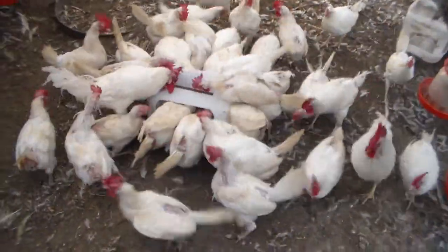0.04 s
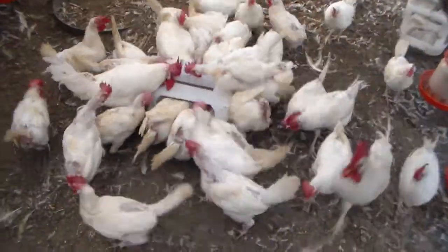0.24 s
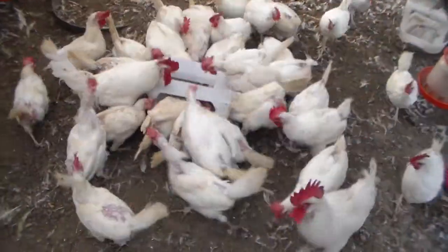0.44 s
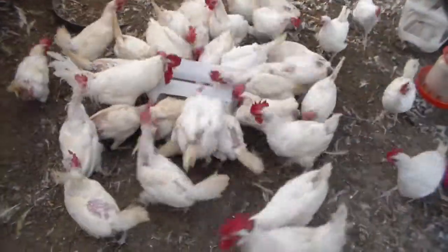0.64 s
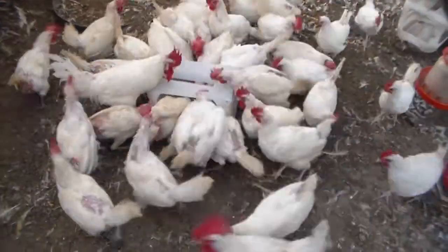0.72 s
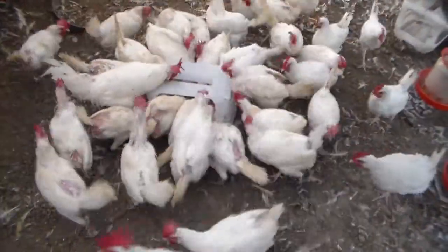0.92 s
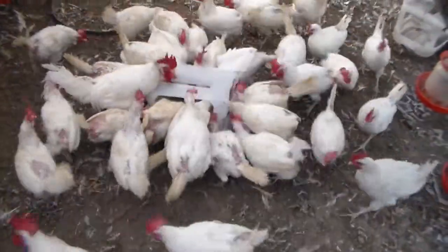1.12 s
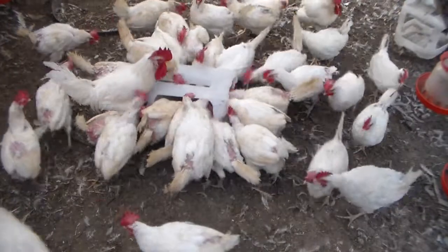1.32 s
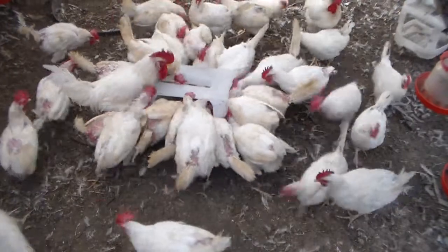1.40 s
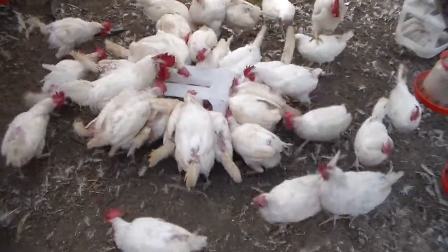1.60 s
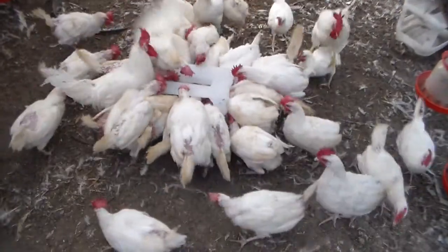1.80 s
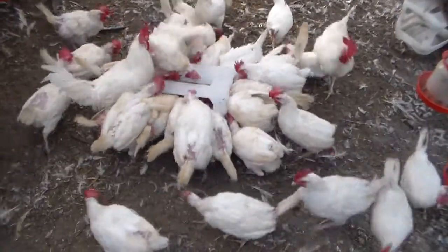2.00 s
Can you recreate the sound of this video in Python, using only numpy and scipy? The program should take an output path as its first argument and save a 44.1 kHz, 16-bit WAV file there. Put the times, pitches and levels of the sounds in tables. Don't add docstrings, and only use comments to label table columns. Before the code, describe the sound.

Close stereo pickup of a flock feeding: hard beak taps ring and rattle a plastic feeder, grit sprays wide, bodies thump softly, litter rustles faintly, and hens moan, cluck and finally whistle over the late pecks.

```python
import sys
import numpy as np
from scipy import signal
from scipy.io import wavfile

SR = 44100
rng = np.random.default_rng(int(sys.argv[2]) if len(sys.argv) > 2 else 0)


def makeup_ratio(level_db):
    decades = np.asarray(level_db, float) / 20
    return 10 ** decades


def output_pcm(signal):
    pcm = np.clip(np.atleast_2d(signal).T, -1, 1) * 32767
    wavfile.write(sys.argv[1], SR, np.round(pcm).astype(np.int16))


N = 90493

# start_s, grit_peak_db, trough_wall_db, length_s
PECKS = [(0.093, -49, -22, 0.011), (0.148, -21, -27.5, 0.031), (0.2116, -15, -21, 0.012),
         (0.218, -15, -15, 0.016), (0.242, -45, -24.5, 0.018), (0.299, -27.5, -24, 0.018),
         (0.329, -20.5, -40, 0.016), (0.385, -24, -44, 0.008), (0.419, -24.5, -43, 0.0093),
         (0.13, -26, -51, 0.014), (0.2652, -13.5, -21, 0.02), (0.4555, -12, -24.5, 0.02),
         (0.505, -24, -18, 0.057), (0.602, -23, -17, 0.044), (0.061, -22, -32, 0.006),
         (0.681, -18.5, -48, 0.019), (0.7144, -18, -16, 0.014), (0.7728, -24, -12.5, 0.02),
         (0.842, -17.5, -10.5, 0.021), (0.865, -21.5, -17, 0.029), (0.9135, -20, -20, 0.017),
         (1.01, -22.5, -40, 0.027), (1.131, -22.5, -36, 0.036), (1.192, -22, -23.5, 0.018),
         (1.2188, -17.5, -13, 0.021), (0.977, -25.5, -40, 0.015), (1.249, -26.5, -16, 0.038),
         (1.3827, -29.5, -22, 0.023), (1.446, -24, -30, 0.01), (1.471, -34, -23, 0.025),
         (1.5181, -10, -11.5, 0.017), (1.575, -32, -18, 0.017), (1.605, -32, -18.5, 0.012),
         (1.668, -45, -19, 0.012), (1.691, -25, -27, 0.017), (1.778, -30, -21, 0.017),
         (1.5448, -9, -20.5, 0.017), (1.8248, -17.5, -10, 0.009), (1.935, -16, -16.5, 0.037),
         (1.9777, -28, -18.5, 0.011), (2.036, -18.5, -10.5, 0.033)]
# frequency_hz, level_db (per Hz)
GRIT_SPECTRUM = [(1470, -27), (2500, -10), (3380, -8), (5520, -11), (14000, -22)]
# frequency_hz, width_hz, level_db
TROUGH_MODES = [(600, 116, 3), (875, 98, 5.5), (1200, 290, 2), (1840, 360, -1.5), (2500, 360, -4.5),
                (3550, 610, -10.5)]
# start_s, peak_db, ring_hz
BEAK_STRIKES = [(0.22, -5, 1740), (0.2245, -12, 1160), (0.27, -5.5, 8400), (0.27, -7, 6900),
                (.4585, -5, 2020), (.512, -11, 1660), (.521, -6, 800), (.7225, -3, 870), (.2135, -10, 2300),
                (.618, -17, 2900), (1.6135, -20, 1800), (1.8, -16, 1640), (1.389, -16, 875),
                (.111, -20.5, 620), (1.967, -4.5, 1540), (1.942, -6, 2700), (.848, -6, 1700),
                (.873, -4.5, 2100), (1.1414, -12.5, 1270), (1.2213, -2, 2130), (1.2265, -2, 2140),
                (1.229, -11, 590), (1.249, -14, 2500), (1.2615, -7, 680), (1.5254, -14, 3300),
                (1.5272, -7, 1330), (1.551, -1.5, 3500), (1.885, -15, 9600), (1.443, -35, 5000)]
# start_s, peak_db, pitch_hz
THUMPS = [(0.095, -21.5, 584), (0.144, -30.5, 190), (0.303, -24, 203), (.506, -23, 343), (0.502, -39.5, 94),
          (0.717, -10.5, 325), (0.778, -27.5, 208), (0.848, -13.5, 350), (0.867, -25, 200),
          (1.015, -25, 114), (1.222, -18.5, 616), (.243, -33, 170), (0.551, -34, 207), (0.586, -37.5, 170),
          (1.42, -34, 182), (1.53, -33, 160), (1.712, -28, 302), (1.171, -45, 328), (1.257, -20, 261),
          (1.397, -34.5, 130), (1.479, -13, 550), (1.524, -18, 334), (1.576, -22.5, 233),
          (1.813, -22.5, 376), (1.827, -25.5, 214), (1.922, -20.5, 328), (1.959, -13.5, 590),
          (2.037, -21, 210)]
# start_s, length_s, start_hz, end_hz, level_db
PEEPS = [(.175, 0.054, 834, 928, -28), (.5, 0.013, 1150, 1223, -15.5), (.535, 0.013, 1220, 1260, -17),
         (1.3265, 0.013, 1485, 1685, -21.5), (.973, 0.013, 4100, 4170, -29),
         (1.265, .022, 3600, 3640, -30.5), (1.275, 0.011, 1650, 1690, -24), (1.105, 0.011, 1260, 1310, -22),
         (1.222, 0.013, 2086, 1894, -15.5), (.219, 0.016, 1138, 1125, -16.5), (.267, 0.012, 900, 823, -19),
         (.606, 0.027, 2150, 1965, -19.5), (.625, 0.022, 2500, 2400, -23.5),
         (.945, 0.013, 1502, 1483, -5.5), (.946, 0.016, 1780, 1730, -13.5), (.971, 0.018, 1408, 1345, -16),
         (1.104, 0.019, 846, 863, -24), (1.125, 0.038, 864, 880, -34), (1.565, 0.011, 1002, 1006, -11.5),
         (1.61, 0.011, 1347, 1255, -11), (1.626, 0.021, 1040, 1192, -16)]
# start_s, length_s, start_hz, end_hz, level_db
CLUCKS = [
    (.49, 0.091, 568.8, 600, -25),
    (.925, 0.052, 600, 667, -26.5),
    (1.0, 0.02, 808, 716, -21.5),
    (1.022, 0.031, 711, 650, -16.5),
    (1.262, 0.026, 560.7, 577, -16),
    (1.33, 0.016, 751, 840, -27.5),
    (1.583, 0.045, 858, 760, -26),
    (1.606, 0.044, 692, 622, -16),
]
# time_s, pitch_hz, level_db
SQUAWK = [
    (0, 333.6, -8),
    (.03, 319.8, -8.5),
    (.05, 322.3, -17.5),
    (.068, 293, -24.5),
    (.078, 303, -63),
]
# time_s, pitch_hz, level_db
MOAN = [
    (.53, 600, -42),
    (.6, 600, -25),
    (.65, 624.4, -22),
    (.72, 611.3, -19),
    (.78, 564.2, -15),
    (.88, 532.3, -25),
    (.92, 538, -27.5),
    (.94, 523.6, -50),
]
# time_s, pitch_hz, level_db
WAIL = [
    (.492, 827.7, -23),
    (.51, 849, -16),
    (.55, 854, -19.5),
    (.59, 764, -23),
    (.62, 710, -18.5),
    (.72, 660, -29),
    (.75, 660, -34),
]
# time_s, pitch_hz, level_db
LATE_MOAN = [
    (1.64, 640, -20),
    (1.7, 600, -31),
    (1.74, 590.8, -24.5),
    (1.78, 554, -23.5),
    (1.82, 524.5, -22.5),
    (1.86, 600, -25),
    (1.905, 611.7, -18),
    (1.95, 555.5, -19),
    (1.99, 550.6, -23.5),
]
# time_s, pitch_hz, level_db
WHISTLE = [
    (1.795, 896, -21),
    (1.801, 896, -14),
    (1.828, 1010, -6),
    (1.838, 1075, -14),
    (1.853, 1097, -14.5),
    (1.879, 1163, -25),
    (1.884, 1245, -6),
    (1.912, 1244, -12.5),
    (1.945, 1112, -21.5),
]
PEEP_PARTIALS = [-4, -30]
CLUCK_PARTIALS = [0.5, 3, -12, -29]
SQUAWK_PARTIALS = [-52, -13, -5.5, 3, 3.5, -10, -10, 0, -15, -15, -14, -10.5, -22, -17, -19, -17]
MOAN_PARTIALS = [12, 12, 4, -1, -30]
WAIL_PARTIALS = [-1, 5, -9, -30]
LATE_MOAN_PARTIALS = [1, -2, -0.5, -10.5, -14.5]
# delay_s, level_db
ECHOES = [
    (.013, -17.5),
    (.037, -32.5),
]
# time_s, level_db
BUSTLE = [
    (0, -44),
    (.2, -41.5),
    (.38, -45),
    (.75, -36),
    (1.0, -39),
    (1.08, -42.5),
    (1.2, -40.5),
    (1.33, -44.5),
    (1.7, -40),
    (2.05, -36.5),
]
# frequency_hz, level_db (per Hz)
LITTER_SPECTRUM = [(15, -37), (25, -0.5), (75, -12.5), (301, -2.5), (462, -7.5), (1150, -4.5), (12400, -28),
                   (13800, -27), (15000, -60)]
# frequency_hz, likeness (0 to 1)
LIKENESS = [(30, 0.65), (120, 1), (700, 0.98), (2000, 0.58), (4000, 0.4), (12000, 0.017)]


def pecks():
    t = np.arange(N) / SR
    grit_level, wall_level = np.zeros(N), np.zeros(N)
    for start_s, grit_db, wall_db, length_s in PECKS:
        since = np.maximum(t - start_s, 0)
        spray = np.exp(-(since / length_s) ** 1.5)
        snap = makeup_ratio(-6.5) * np.exp(-since / 0.0023)
        grit_level += makeup_ratio(grit_db - 7) * (1 - np.exp(-since / 0.0012)) * (spray + snap)
        rattle = (1 - np.exp(-since / 0.0015)) * np.exp(-(since / length_s) ** 2)
        wall_level += makeup_ratio(wall_db - 0.5) * rattle
    knocks = grains(4000, 2.5)[0]
    wall = 0
    for k, (hz, width_hz, db) in enumerate(TROUGH_MODES):
        r = np.exp(-np.pi * width_hz / SR)
        poles = [1, -2 * r * np.cos(2 * np.pi * hz / SR), r * r]
        wall = wall + (-1) ** k * makeup_ratio(db) * signal.lfilter([1 - r, 0, r - 1], poles, knocks)
    grit = colour(grains(7000, 4.0), GRIT_SPECTRUM, patchy_db=2)
    return grit_level * grit, wall_level * unit(wall)


def beak_strikes():
    ring_s, fade_cycles = 0.05, 2.5
    t, out = np.arange(N) / SR, 0
    for start_s, db, hz in BEAK_STRIKES:
        cycles = np.clip(t - start_s, 0, ring_s) * hz
        ring = np.exp(-cycles / fade_cycles) * np.sin(2 * np.pi * cycles)
        out = out + makeup_ratio(db) * ring * (t < start_s + ring_s)
    return out


def thumps():
    peak_cycles = 1.044
    t, out = np.arange(N) / SR, 0
    for start_s, db, hz in THUMPS:
        cycles = np.maximum(t - start_s, 0) * hz
        push = cycles / peak_cycles * np.exp(1 - cycles / peak_cycles)
        out = out + makeup_ratio(db + 5.5) * push * np.sin(2 * np.pi * cycles)
    return out


def hens():
    hoarse = dict(jitter=0.022, rasp_db=4, half_db=-14)
    return (calls(PEEPS, 0.0016, PEEP_PARTIALS, jitter=0.007, rasp_db=1.5, half_db=-13.5)
            + calls(CLUCKS, 0.011, CLUCK_PARTIALS, jitter=0.0131, rasp_db=1.5, half_db=-16.5)
            + voice(SQUAWK, SQUAWK_PARTIALS, jitter=0.011, rasp_db=4, half_db=-15.5)
            + voice(MOAN, MOAN_PARTIALS, **hoarse)
            + voice(WAIL, WAIL_PARTIALS, **hoarse)
            + voice(LATE_MOAN, LATE_MOAN_PARTIALS, **hoarse)
            + voice(WHISTLE, [0, -30], jitter=0.003, rasp_db=0.7, half_db=-30))


def calls(table, attack_s, partials_db, jitter, rasp_db, half_db):
    release_s, edge_db = 0.0062, 25
    out = 0
    for start_s, length_s, start_hz, end_hz, db in table:
        end_s = start_s + length_s
        rows = [(start_s - attack_s, start_hz, db - edge_db),
                (start_s, start_hz, db),
                (end_s - release_s / 2, end_hz, db - 2.5),
                (end_s + release_s, end_hz, db - edge_db)]
        out = out + voice(rows, partials_db, jitter, rasp_db, half_db)
    return out


def voice(rows, partials_db, jitter, rasp_db, half_db):
    time_s, hz, db = np.transpose(rows)
    t = np.arange(N) / SR
    pitch_hz = np.interp(t, time_s, hz) * (1 + jitter * drift(120))
    phase = 2 * np.pi * np.cumsum(pitch_hz) / SR
    tone = 0
    for k, partial_db in enumerate(partials_db):
        rasp = makeup_ratio(partial_db + rasp_db * drift(90))
        blur = rng.uniform(0, 2 * np.pi) + 0.14 * rasp_db * drift(200)
        tone = tone + rasp * np.sin((k + 1) * phase + blur)
    tone = unit(tone) * (1 + makeup_ratio(half_db) * np.sin(phase / 2))
    return tone * makeup_ratio(np.interp(t, time_s, db, left=-120, right=-120))


def shed(x):
    out = np.zeros((2, N))
    dull = signal.lfilter([0.4], [1, -0.6], x)
    for delay_s, db in ECHOES:
        for side, stretch in enumerate([0.93, 1.07]):
            lag = int(delay_s * stretch * SR)
            out[side, lag:] += makeup_ratio(db) * dull[:N - lag]
    return out


def litter():
    time_s, db = np.transpose(BUSTLE)
    swell_db = np.interp(np.arange(N) / SR, time_s, db) + 36 + drift(18)
    source = rng.standard_normal((2, N)) + makeup_ratio(-8) * grains(420, 4.5)
    return makeup_ratio(-27) * colour(source, LITTER_SPECTRUM, patchy_db=3.0, swell_db=swell_db)


def colour(source, spectrum, patchy_db, swell_db=0):
    treble_steady_hz = 2900
    out, edges = 0, 22 * 2 ** np.arange(0, 9.6, 0.5)
    for k, (low, high) in enumerate(zip(edges, edges[1:])):
        band = signal.butter(2, [low, high], "band", fs=SR, output="sos")
        mid, side = signal.sosfilt(band, source) * (-1) ** k
        hz = np.sqrt(low * high)
        alike = np.clip(at_hz(LIKENESS, hz), 0, 1)
        flicker_db = (patchy_db * drift(10.1) + swell_db) * min(1, np.sqrt(treble_steady_hz / hz))
        gain = makeup_ratio(at_hz(spectrum, hz) + flicker_db)
        wide = np.sqrt(1 - alike) * side * [[1], [-1]]
        out = out + gain * (np.sqrt(1 + alike) * mid + wide)
    return unit(out)


def grains(per_s, spread_db):
    sizes = makeup_ratio(spread_db * np.minimum(rng.exponential(1, (2, N)), 4))
    sizes = sizes * rng.choice([-1, 1], (2, N))
    return unit(sizes * (rng.random((2, N)) < per_s / SR))


def drift(rate_hz):
    r = np.exp(-2 * np.pi * rate_hz / SR)
    noise = rng.standard_normal(N + SR // 4)
    return unit(signal.lfilter([1], [1, -2 * r, r * r], noise)[SR // 4:])


def at_hz(points, hz):
    table_hz, value = np.transpose(points)
    return np.interp(np.log(hz), np.log(table_hz), value)


def unit(x):
    return x / np.sqrt(np.mean(x ** 2) + 1e-20)


def scene():
    grit, wall = pecks()
    near = wall + beak_strikes() + thumps() + hens()
    return near + shed(near) + grit + litter()


def band_limit(x):
    return signal.sosfilt(signal.butter(12, 15430, fs=SR, output="sos"), x)


def record(dry):
    rounded = np.tanh(dry)
    top_cut = signal.cheby2(14, 34, 14500, fs=SR, output="sos")
    mix = signal.sosfilt(top_cut, rounded)
    return band_limit(mix)


dry = scene()
out = record(dry)
output_pcm(out)
```